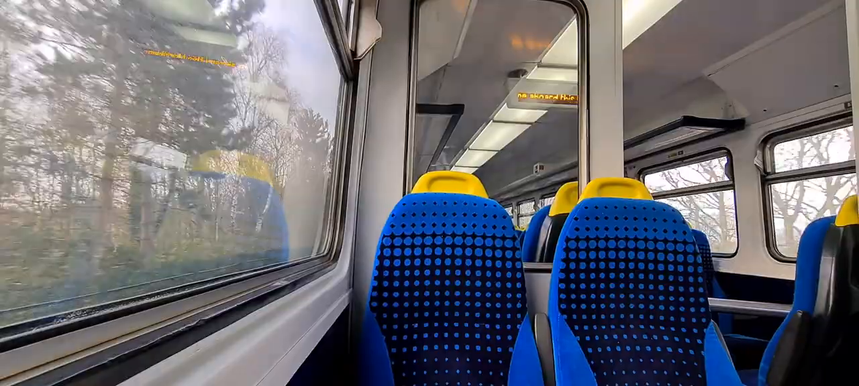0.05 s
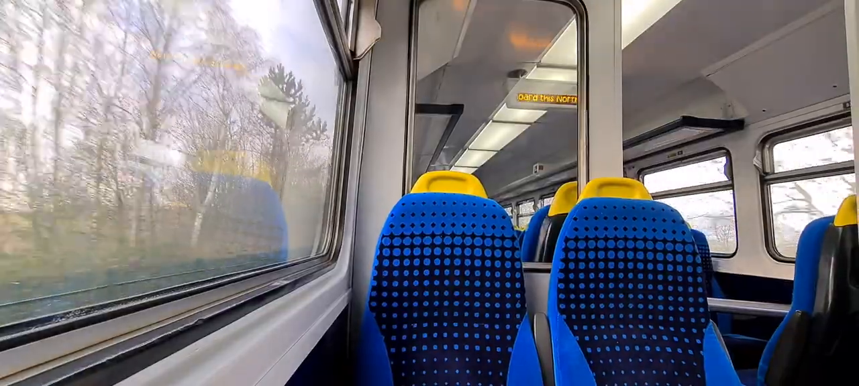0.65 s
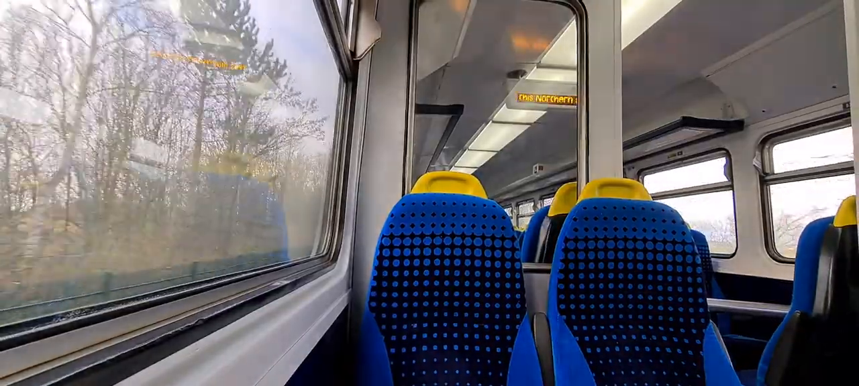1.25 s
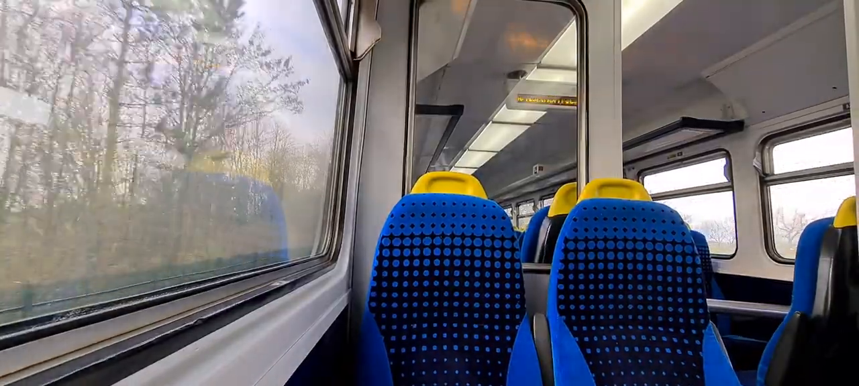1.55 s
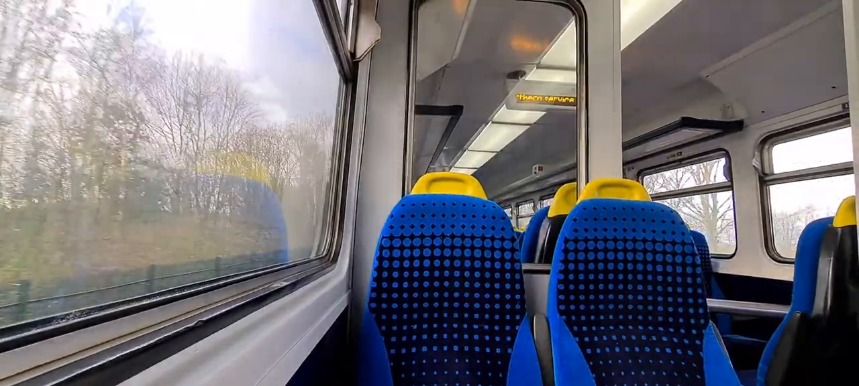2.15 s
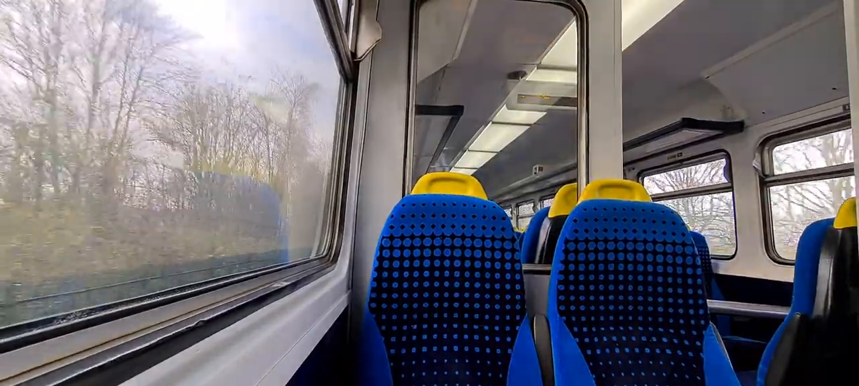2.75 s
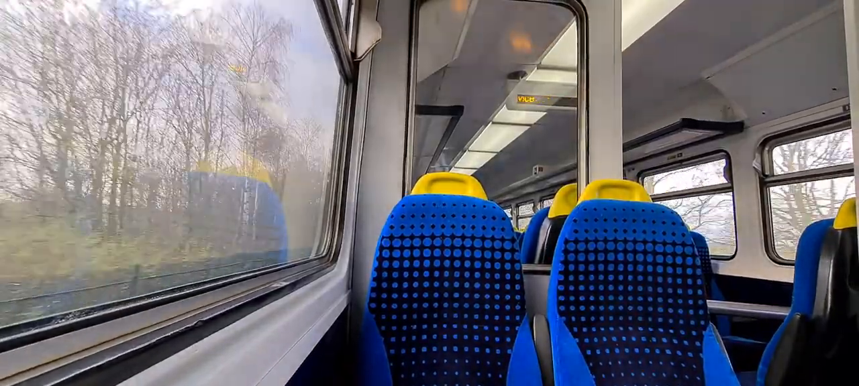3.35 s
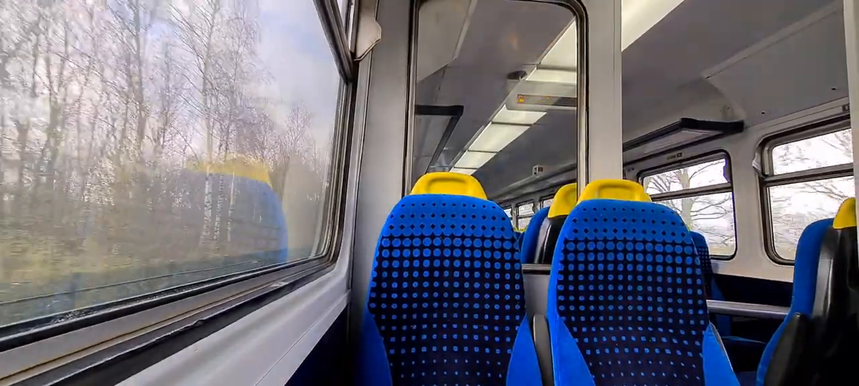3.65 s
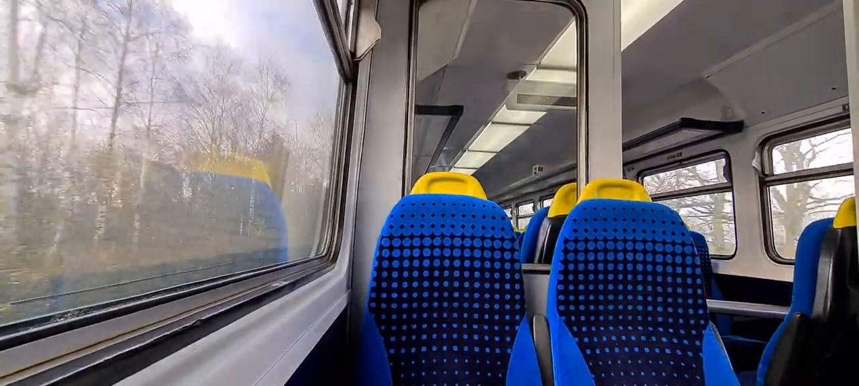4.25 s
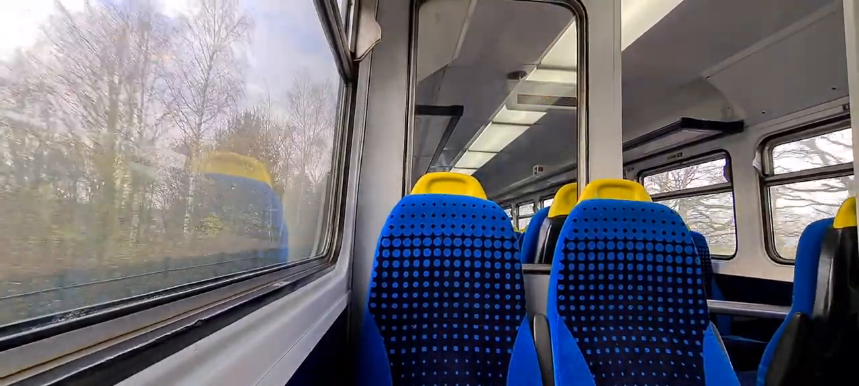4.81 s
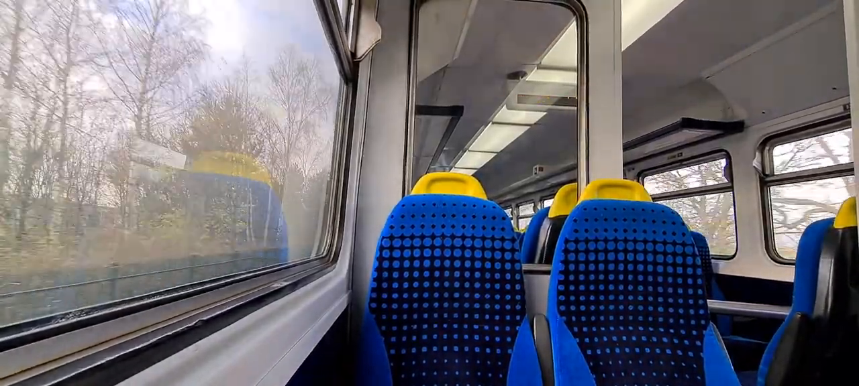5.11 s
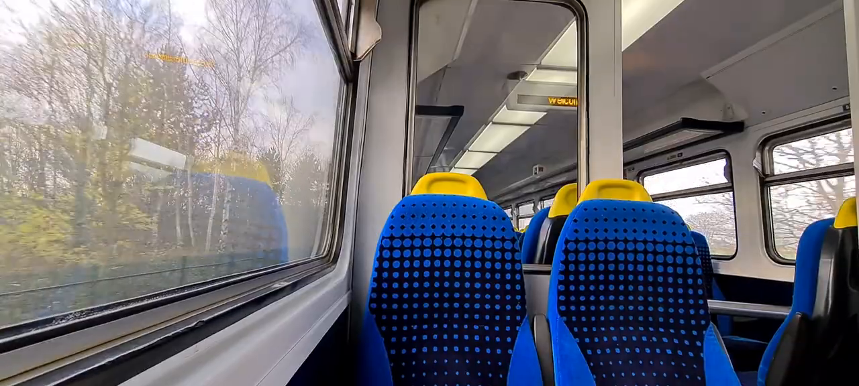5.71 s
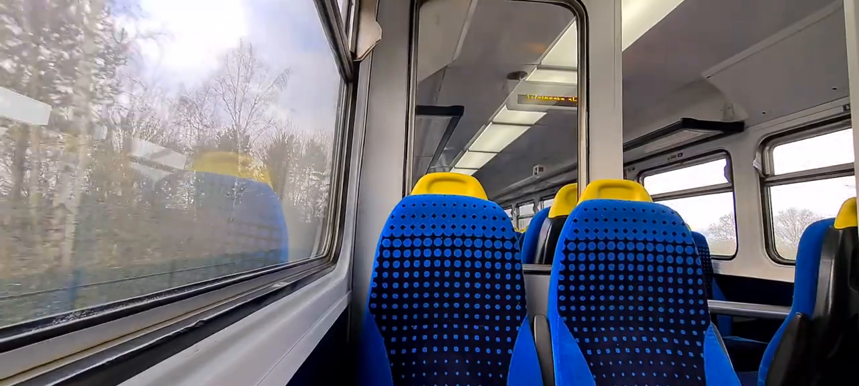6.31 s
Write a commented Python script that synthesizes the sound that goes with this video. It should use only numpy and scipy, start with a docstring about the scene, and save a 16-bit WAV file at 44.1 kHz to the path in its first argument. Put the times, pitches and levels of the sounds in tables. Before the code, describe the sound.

A diesel train runs at speed, heard from a window seat with the microphone close to the glass. The underfloor engine holds a deep, booming drone throughout, with a faint buzz and a low throb beneath it. The wheels rumble through the floor, their roar swelling briefly a few times on rougher rail. Air rushes softly along the body and hisses faintly at the window.

```python
"""A window seat in a diesel railcar at speed, stereo microphone close to the glass. From the start the
underfloor engine turns near 1900 rpm, its orders booming in the saloon, one far above the rest; the
wheels rumble, and air rushes along the body and flutters at the window. A drive shaft's throb swells in
the first second, eases towards five seconds and comes back. Rough rail lifts the roar of the wheels,
most near 0.9, 3.7 and 5.5 seconds and at the very end."""
import sys
import numpy as np
from scipy import signal
from scipy.fft import rfft, irfft, next_fast_len
from scipy.io import wavfile
from scipy.ndimage import map_coordinates

SR = 44100
rng = np.random.default_rng(int(sys.argv[2]) if len(sys.argv) > 2 else 0)


def generate_wav(signal):
    """Clip the signal to [-1, 1] and save it as 16-bit WAV at the path in sys.argv[1]."""
    frames = np.transpose(np.atleast_2d(signal))
    scaled = np.clip(frames, -1, 1) * 32767
    pcm = np.round(scaled).astype(np.int16)
    wavfile.write(sys.argv[1], SR, pcm)


N = 289737

# The strong engine orders at the seat. Each row: multiple of the cycle rate, left and right level in dB
# before sway and the drone's overall gain, radians by which the left leads.
ENGINE_ORDERS = [(2, -38, -38, -0.1), (3, -34, -34, -0.2), (4, -37, -39, -0.1), (5, -33, -34, -0.1),
                 (6, -35, -35, -0.2), (7, -15, -16, -0.1), (8, -36, -36, 0.1), (9, -28, -26, -0.0),
                 (10, -36, -36, 0.1), (11, -30, -29, -0.2), (12, -49, -43, -2.7), (13, -34, -42, -0.6),
                 (14, -34, -48, 1.8), (15, -28, -37, -1.6), (16, -49, -55, -0.2), (17, -41, -41, -0.1),
                 (18, -30, -34, 0.2), (19, -38, -38, -0.1), (20, -41, -53, 2.2), (21, -41, -48, 0.4),
                 (23, -46, -48, 0.1), (24, -58, -51, -1.4), (26, -51, -66, 2.1), (29, -52, -63, -1.6),
                 (31, -58, -51, -0.9), (33, -47, -53, -0.0), (41, -60, -52, 0.3), (47, -55, -55, 0.4),
                 (58, -59, -57, 0.5), (59, -57, -58, -0.6), (60, -54, -58, 1.2)]


def amp(db):
    """Gain of a level in dB."""
    return 10 ** (np.asarray(db) / 20)


def along(points, hz):
    """(Hz, value) points read on a log frequency axis."""
    freqs, values = np.transpose(points)
    return np.interp(np.log(hz + 1e-3), np.log(freqs), values)


def wobble(rate):
    """A smooth random curve, rate knots a second."""
    coarse = np.arange(0, N + 64, 64)
    knots = rng.standard_normal(int(N * rate / SR) + 4)
    return np.interp(np.arange(N), coarse, map_coordinates(knots, [coarse * rate / SR]))


def filtered(x, response):
    """x shaped by response, a gain as a function of Hz."""
    size = next_fast_len(N + SR // 2)
    return irfft(rfft(x, size) * response(np.fft.rfftfreq(size, 1 / SR)), size)[..., :N]


def peak(hz, centre_hz, width_hz):
    """Gain of one narrow resonance, 1 at its centre."""
    return 1 / (1 + ((hz - centre_hz) / (width_hz / 2)) ** 2)


def white():
    """Two unrelated noises of 0 dB per Hz."""
    return rng.standard_normal((2, N)) * np.sqrt(SR / 2)


def diffuse(gain):
    """Noise that fills the saloon: long waves reach both sides of the microphone alike, short ones not."""
    # Each row: frequency in Hz, left-right likeness (1 or more is fully alike).
    likeness = [(100, 1.5), (170, .96), (250, 0.54), (350, 0.8), (450, 0.6), (560, 0.1), (740, 0.76),
                (1100, -0.15), (2000, 0)]
    # Each row: frequency in Hz, left over right in dB.
    balance = [(150, 0), (250, -3), (310, 1.5), (430, 1.5), (560, 1.5), (740, -3), (1600, 1), (2200, -1),
               (4500, -.5), (6000, -3), (7600, 1.5)]
    spread = lambda hz: np.arccos(np.clip(along(likeness, hz), -1, 1)) / 2
    mid, side = filtered(white(), lambda hz: gain(hz) * np.array([np.cos(spread(hz)), np.sin(spread(hz))]))
    left_right = np.array([mid + side, mid - side])
    return filtered(left_right, lambda hz: amp(np.outer([1, -1], along(balance, hz)) / 2))


def reflections(x, level_db=-12, span_s=.01, count=14):
    """Nearby window, wall and seat backs send weak early copies to each side, rippling the spectrum."""
    taps = np.zeros((2, SR // 20))
    taps[:, 0] = 1
    for side in taps:
        delays = 1 + (rng.random(count) * span_s * SR).astype(int)
        side[delays] += amp(level_db) * rng.choice([-1, 1], count) / np.sqrt(count)
    return signal.fftconvolve(x, taps, axes=1)[:, :N]


def slipstream(gust_db=0.43, air_flutter_db=0.27, shared_eddy_db=0.64, side_eddy_db=1.53):
    """Air rushes along the body; eddies make the window seals' hiss flutter and the gaps sing faintly."""
    # Air along the body. Each row: frequency in Hz, level in dB per Hz.
    air_spectrum = [(200, -101), (520, -71), (740, -74), (950, -72.5), (1080, -72.5), (1500, -71.5),
                    (1880, -73), (2050, -76), (3000, -79), (4200, -82.5), (4800, -83), (7400, -86.5),
                    (8700, -99), (15500, -106)]
    # Hiss at the seals. Each row: frequency in Hz, left and right level in dB per Hz.
    seal_spectrum = [(2500, -115, -115), (4800, -102, -85.5), (5900, -100, -94), (6840, -95, -84.5),
                     (7800, -86.5, -100), (8530, -96, -94.5), (9200, -102, -91.5), (9730, -99, -87.5),
                     (11000, -95, -89.5), (12000, -97, -87.5), (13500, -97, -92), (15400, -99, -97)]
    # Gaps round the window. Each row: resonance in Hz, width in Hz, left and right level in dB per Hz.
    gap_modes = [(3500, 350, -87, -82.5), (4740, 240, -80.5, -83.5), (6000, 47, -98, -77),
                 (6860, 120, -86, -97), (7965, 50, -80, -102)]
    gust = gust_db * wobble(3.28)
    eddies = wobble(32)
    rush = diffuse(lambda hz: amp(along(air_spectrum, hz))) * amp(gust + air_flutter_db * eddies)
    seals = np.array(seal_spectrum)
    hiss = filtered(white(), lambda hz: amp([along(seals[:, [0, side]], hz) for side in (1, 2)]))
    singing = filtered(white(), lambda hz: sum(np.outer(amp(sides_db), peak(hz, centre, width))
                                               for centre, width, *sides_db in gap_modes))
    flutter = shared_eddy_db * eddies + side_eddy_db * np.array([wobble(40), wobble(40)])
    return reflections(rush + hiss * amp(gust + flutter)) + singing * amp(flutter)


def rail_roughness():
    """The roar's rise in dB: it swells and fades smoothly as the wheels cross each rough stretch."""
    # Each row: middle in seconds, length in seconds, rise in dB.
    stretches = [(0.85, .26, 5), (2.45, .5, 1), (3.72, .22, 6), (4.916, .16, 2), (5.55, 0.57, 5),
                 (6.55, .16, 5)]
    t = np.arange(N) / SR
    return sum(rise_db * np.cos(np.pi * np.clip((t - middle) / length, -.5, .5)) ** 2
               for middle, length, rise_db in stretches)


def running_gear(rumble_sway_db=1.3, roar_sway_db=0.7, smooth_rail_db=-0.8):
    """Bogies rumble through the floor and ring the saloon; rougher rail makes the wheels roar."""
    # Rumble through the floor. Each row: frequency in Hz, level in dB per Hz.
    rumble_spectrum = [(8, -85), (15, -68), (21, -71), (45, -56), (85, -56.5), (112, -50), (138, -51.5),
                       (165, -49.5), (200, -56.5), (260, -58.5), (310, -61.5), (400, -68.5), (600, -81),
                       (1500, -115)]
    # Saloon and panel resonances. Each row: centre in Hz, width in Hz, level in dB per Hz.
    saloon_modes = [(163, 3.7, -48), (303, 4.6, -49.5)]
    # Wheels on the rails. Each row: frequency in Hz, level in dB per Hz before the rail's gain.
    roar_spectrum = [(200, -98), (270, -57), (320, -63.5), (375, -61), (425, -66.5), (460, -64), (540, -77),
                     (800, -91), (1500, -120)]
    ring_power = lambda hz: sum((amp(db) * peak(hz, centre, width)) ** 2
                                for centre, width, db in saloon_modes)
    rumble = diffuse(lambda hz: np.sqrt(amp(along(rumble_spectrum, hz)) ** 2 + ring_power(hz)))
    roar = diffuse(lambda hz: amp(along(roar_spectrum, hz)))
    rail_db = smooth_rail_db + rail_roughness() + roar_sway_db * wobble(12)
    return rumble * amp(rumble_sway_db * wobble(7.6)) + roar * amp(rail_db)


def drive_shaft(shaft_hz=34.2, drift=0.017, sway_db=2.3):
    """The slightly unbalanced shaft throbs, beating slowly against the crank rate."""
    # Each row: time in seconds, level in dB.
    throb_levels = [(0.0, -36), (1.0, -28.5), (3.0, -30.5), (4.7, -37), (6.57, -31)]
    throb_db = np.interp(np.arange(N) / SR, *np.transpose(throb_levels))
    phase = 2 * np.pi * np.cumsum(shaft_hz * (1 + drift * wobble(1))) / SR
    return np.sqrt(2) * amp(throb_db + sway_db * wobble(2.23)) * np.sin(phase)


def engine_speed(start_hz=15.837, rise_hz_per_s=.0063):
    """Engine cycles a second, two crank turns each, creeping up as the train gains speed."""
    return start_hz + rise_hz_per_s * np.arange(N) / SR


def engine_angle():
    """Phase of the engine cycle; the governor lets the speed hunt very slightly."""
    hunt = .0005 * wobble(4)
    return 2 * np.pi * np.cumsum(engine_speed() * (1 + hunt)) / SR


def combustion(angle, level_db=-77, centre_hz=780, width_hz=330, firing_depth=0.65, uneven_depth=0.44):
    """A soft clatter that pulses with the six firings of each cycle, some cylinders louder than others."""
    rasp = diffuse(lambda hz: amp(level_db) / (1 + ((hz - centre_hz) / width_hz) ** 4))
    return rasp * (1 + firing_depth * np.cos(6 * angle)) * (1 + uneven_depth * np.cos(angle))


def panel_buzz(angle, scatter_db=2.0, sway_db=2.0, count=112, cycle_samples=4096):
    """Weak upper engine orders buzz in the panels, each reaching each side at a chance strength."""
    # Each row: frequency in Hz, level of a typical order in dB.
    buzz_spectrum = [(330, -53.5), (480, -58.5), (600, -58.5), (740, -62.5), (830, -62), (935, -66),
                     (1010, -68), (1500, -71), (1900, -69)]
    orders = np.arange(count)
    hz = orders * np.mean(engine_speed())
    strong_orders = [round(row[0]) for row in ENGINE_ORDERS]
    is_weak = (hz > buzz_spectrum[0][0]) & ~np.isin(orders, strong_orders)
    levels_db = along(buzz_spectrum, hz) + scatter_db * rng.standard_normal((2, count))
    partials = is_weak * amp(levels_db) * np.exp(2j * np.pi * rng.random((2, count)))
    # one cycle of the waveform repeats as the engine turns
    cycle = irfft(partials, cycle_samples) * cycle_samples / np.sqrt(2)
    cycle_angles = 2 * np.pi * np.arange(cycle_samples) / cycle_samples
    return np.array([np.interp(angle, cycle_angles, side, period=2 * np.pi) * amp(sway_db * wobble(3.05))
                     for side in cycle])


def engine_drone(angle, sway_db=1.08, drone_gain_db=-0.2, neighbours=2):
    """The loudest order booms; its nearest neighbours swing in step with it, so it throbs with the crank."""
    drone = np.zeros((2, N))
    boom_order = max(ENGINE_ORDERS, key=lambda row: row[1])[0]
    for order, left_db, right_db, lead in ENGINE_ORDERS:
        # orders further from the boom reach the seat by many paths, in no set step
        scatter = rng.uniform(0, 2 * np.pi) * (abs(order - boom_order) > neighbours)
        phase = order * angle + scatter
        # the flexing body lets every order but the boom sway
        gain = np.sqrt(2) * amp(sway_db * (order != boom_order) * wobble(4.013))
        drone[0] -= amp(left_db) * gain * np.cos(phase + lead / 2)
        drone[1] -= amp(right_db) * gain * np.cos(phase - lead / 2)
    return drone * amp(drone_gain_db)


def scene():
    """Engine, shaft, wheels and air together at the window seat."""
    angle = engine_angle()
    engine = engine_drone(angle) + panel_buzz(angle) + combustion(angle)
    return engine + drive_shaft() + running_gear() + slipstream()


def record(dry, low_hz=22, top_hz=15700):
    """The microphone drops the infrasound, and the recorder keeps nothing above its band limit."""
    low_cut = lambda hz: 1 / np.sqrt(1 + (low_hz / (hz + 1)) ** 10)
    high_cut = lambda hz: 1 / np.sqrt(1 + (hz / top_hz) ** 800)
    return filtered(dry, lambda hz: low_cut(hz) * high_cut(hz))


dry = scene()
out = record(dry)
generate_wav(out)
```